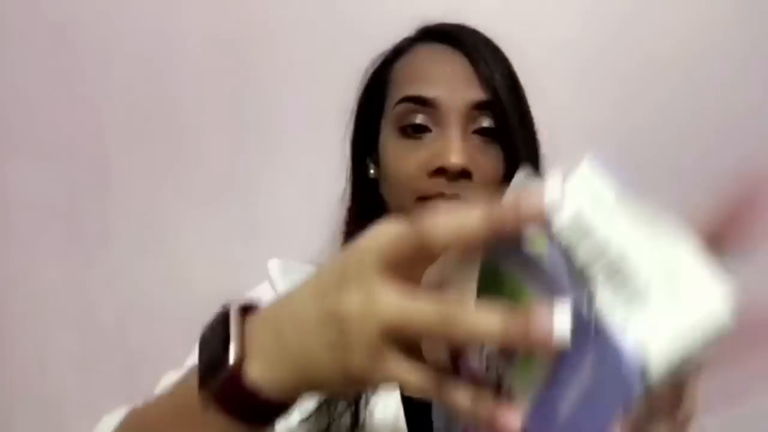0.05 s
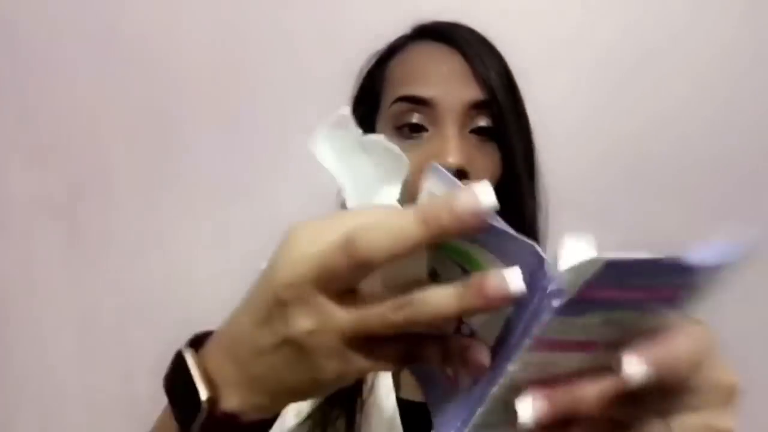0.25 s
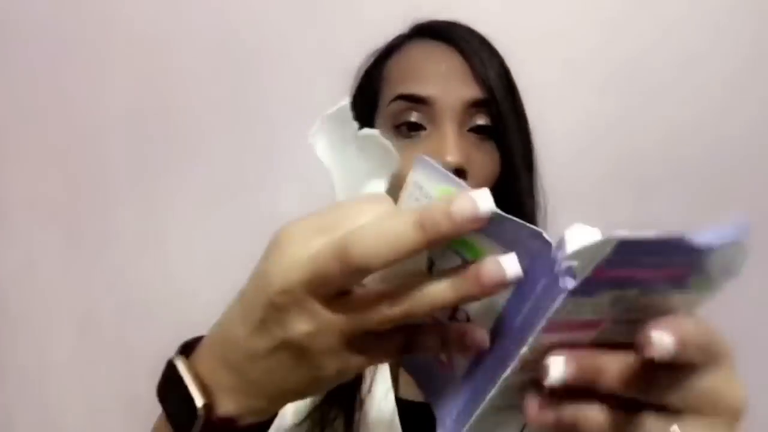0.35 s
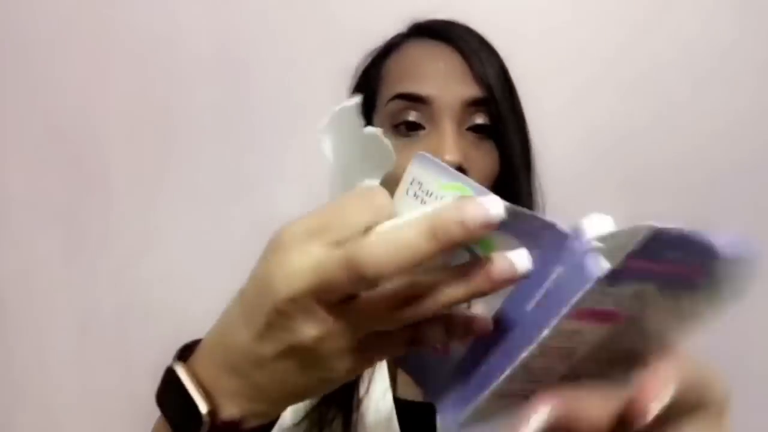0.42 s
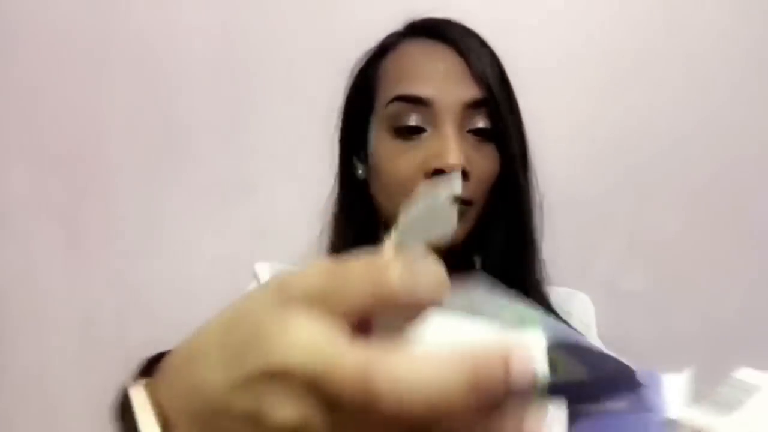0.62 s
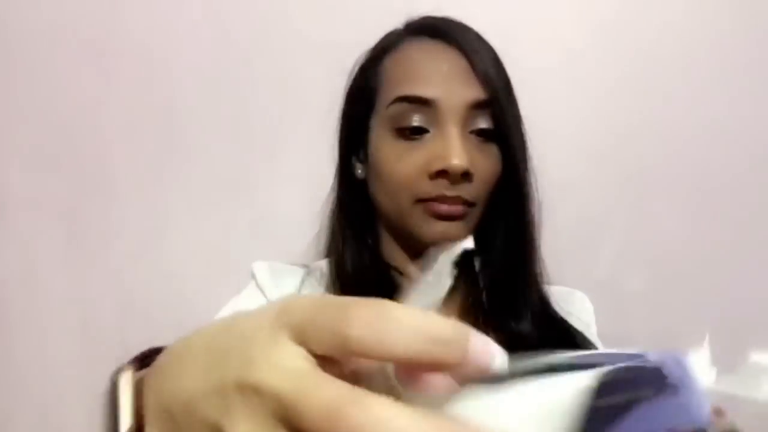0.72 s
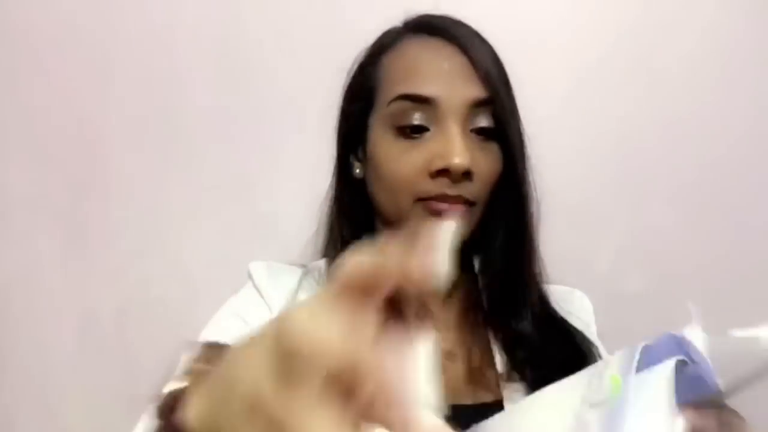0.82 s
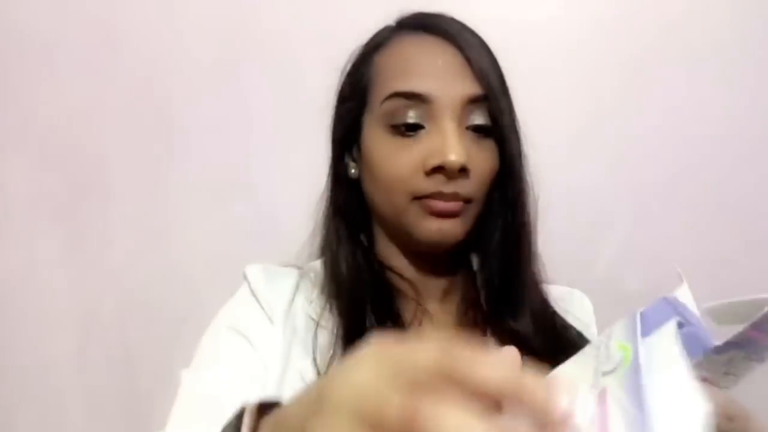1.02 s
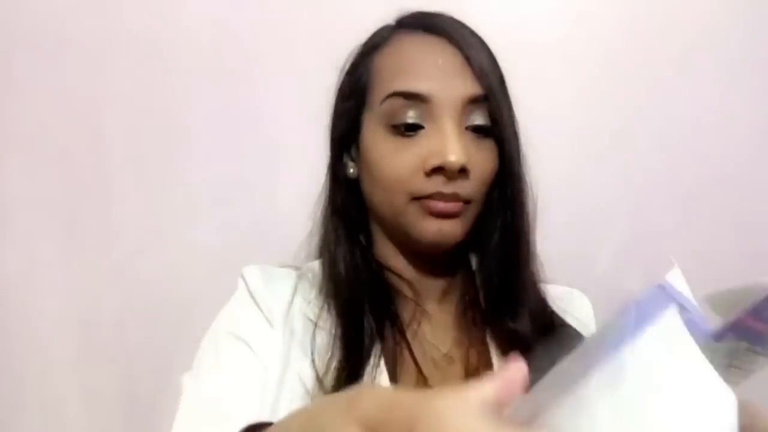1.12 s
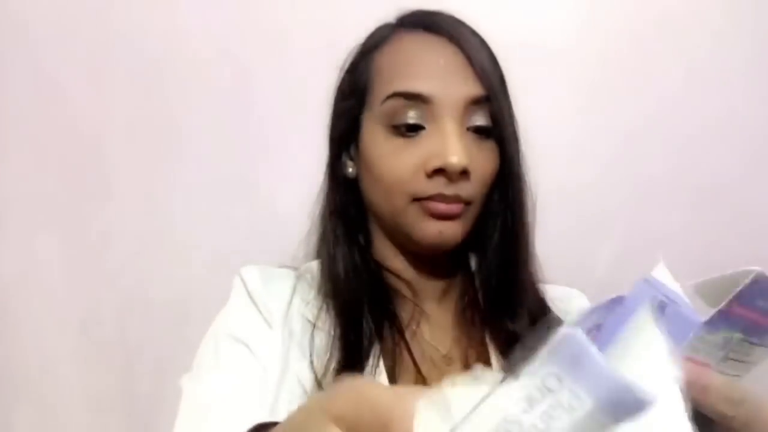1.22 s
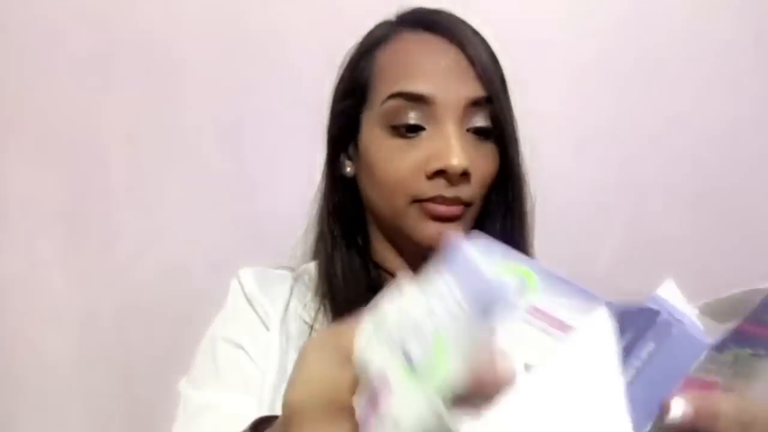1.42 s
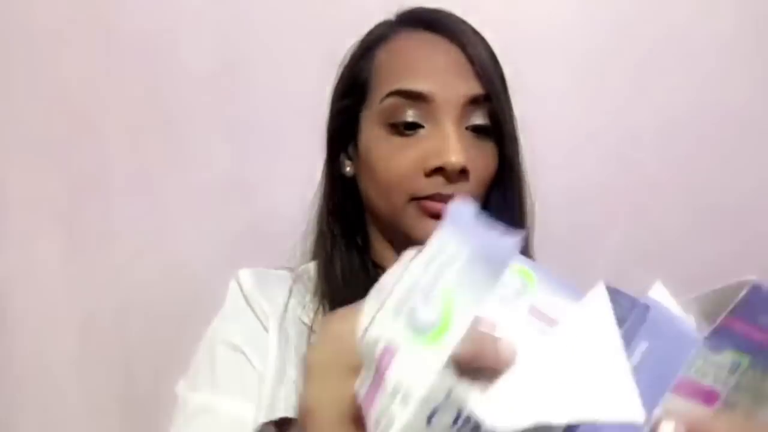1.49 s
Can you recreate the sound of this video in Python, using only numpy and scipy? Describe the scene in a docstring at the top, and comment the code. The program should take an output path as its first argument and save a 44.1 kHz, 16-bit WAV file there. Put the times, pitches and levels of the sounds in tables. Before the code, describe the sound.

A thin cardboard carton is torn and crumpled by hand, close up in a small quiet room. Soft scraping and rustling lead to faint snaps near 0.17 seconds, then a loud, bright pop at 0.22. Small crackles, scrapes and soft low thuds follow, with a crisper cluster around 1.05 to 1.25, thinning to a last light snap at 1.53. Faint room air and hum continue throughout.

```python
"""Hands tear and crumple a thin cardboard carton close to a microphone in a small quiet room.
Scraping and rustling board (band-limited noise) leads to the first faint snaps, then one panel pops loudly.
Smaller creases snap to the end, each an impulsive crack with damped panel modes, among soft low thuds.
Rustle, faint room air (coloured noise) and an appliance's hum (unsteady sines) last throughout."""
import sys
import numpy as np
from scipy import signal
from scipy.fft import rfft, irfft, next_fast_len
from scipy.io import wavfile
from scipy.ndimage import uniform_filter1d, map_coordinates

SR = 44100
rng = np.random.default_rng(int(sys.argv[2]) if len(sys.argv) > 2 else 0)


def bounce(signal):
    """Save signal as a 16-bit WAV file at the path given by the first command-line argument."""
    frames = np.transpose(np.atleast_2d(signal))
    limited = np.clip(frames, -1, 1)
    pcm = np.round(limited * 32767).astype(np.int16)
    wavfile.write(sys.argv[1], SR, pcm)


def elevation(decibels):
    """Turn decibel levels (scalar or array-like) into linear amplitude ratios."""
    levels = np.asarray(decibels, float)
    return 10 ** (levels / 20)


N = 68355  # length in samples


def unit(x):
    """Normalisation: scales a signal to rms 1."""
    return x / np.sqrt(np.mean(x ** 2) + 1e-20)


def coloured(x, points):
    """Linear filtering: shapes x by a spectrum of (f/Hz, level/dB) points, joined on a log frequency axis."""
    m = next_fast_len(x.shape[-1] + 8192)
    f, level = np.transpose(points)
    gain = elevation(np.interp(np.log(np.fft.rfftfreq(m, 1 / SR) + 1), np.log(f + 1), level))
    return irfft(rfft(x, m) * gain, m)[..., :x.shape[-1]]


def wobble(rate):
    """Slow random modulation: a smooth curve through normal knots, rate knots a second."""
    knots = rng.standard_normal(int(N * rate / SR) + 4)
    return map_coordinates(knots, [np.arange(N) * rate / SR])


def add(out, s, x):
    """Superposition: mixes x into out at s seconds."""
    part = out[round(s * SR):][:len(x)]
    part += x[:len(part)]


def ring(t, hz, cycles, sag=0):
    """Damped resonance: envelope peak 1; the pitch starts at (1 + sag) * hz and settles to hz."""
    u = 3 * t * hz / cycles
    envelope = u * np.exp(1 - u)
    return envelope * np.sin(2 * np.pi * (hz * t + sag * (1 - np.exp(-hz * t))))


def room(x):
    """Reverberation: convolution with a fresh noise tail that decays exponentially in each band."""
    # decay time of the room: f/Hz, t60/s
    decay = [(200, 0.35), (530, 0.4), (1400, 0.33), (3700, 0.37), (10000, 0.24)]
    # colour of the reverberation: f/Hz, level/dB
    tail_colour = [(200, -2.5), (1000, -2), (3500, -1.5), (8000, -3), (15000, -3)]
    tail_db, delay_s = -6, 0.0025  # tail level before its colour; lag behind the direct sound
    hz, t, z = signal.stft(rng.standard_normal(SR // 2), SR, nperseg=256)
    f, t60 = np.transpose(decay)
    loss = elevation(-60 * t / np.interp(hz, f, t60)[:, None])
    tail = signal.istft(z * loss, SR, nperseg=256)[1]
    tail = np.pad(tail / np.linalg.norm(tail), (round(delay_s * SR), 0))
    tail = coloured(tail, tail_colour)
    reverb = signal.fftconvolve(np.pad(x, (0, SR // 2)), tail)[:len(x)]
    return x + elevation(tail_db) * reverb


def fibre_crack(t, peak_db):
    """Impulsive fracture: tearing fibres give a broadband burst with a fast rise and exponential decay."""
    # spectrum of a crack: f/Hz, relative level/dB
    crack_colour = [(600, -20.5), (2000, -4.5), (5000, 5), (9000, -2), (15500, -12.5)]
    rise_s, t60_s = 0.00027, 0.0028
    burst = rng.standard_normal(len(t)) * elevation(-60 * t / t60_s) * (1 - np.exp(-t / rise_s))
    crack = coloured(burst, crack_colour)
    return elevation(peak_db) * crack / np.abs(crack).max()


def panel_ring(t, db, hz, cycles):
    """Modal vibration: a buckling panel rings in damped modes, then fibres give way in small crackles."""
    # modes of a panel: multiple of its pitch, level/dB relative to the ring
    modes = [(.72, -13.5), (1.0, -1), (1.4, -16), (2.2, -15)]
    sag, detune = 0.45, 0.051  # detune: random spread of each mode as a fraction of its frequency
    thin_below_hz = 350  # the panel's sound is thinned below this
    after_s, after_db, after_loss_db = 0.02, -13, 247  # mean wait; level under the ring; loss per second
    after_oct, after_cycles = 0.65, 1.58  # pitch spread in octaves; cycles of ring
    panel = np.zeros(len(t))
    for multiple, level in modes:
        mode_hz = hz * multiple * (1 + detune * rng.standard_normal())
        panel += elevation(db + level) * ring(t, mode_hz, cycles, sag)
    for wait, pitch, size in rng.standard_normal((10, 3)):
        late = cycles / hz + after_s * wait ** 2
        crackle_db = db + after_db - after_loss_db * late + 3 * size
        crackle_hz = hz * 2 ** np.clip(after_oct * pitch, -1, 1)
        add(panel, late, elevation(crackle_db) * ring(t[:SR // 50], crackle_hz, after_cycles))
    high_pass = signal.butter(2, thin_below_hz, "high", fs=SR, output="sos")
    return signal.sosfilt(high_pass, panel)


def snaps():
    """Impulse and response: each snapping crease sums a fibre crack and a panel ring, heard in the room."""
    # creases that snap: t/s, ring level/dB, panel pitch f/Hz, cycles of ring, crack peak level/dB
    creases = [(0.165, -31.5, 1520, 1.46, -32), (.172, -43, 1173, 2.2, -38), (.1855, -33.5, 3800, 4.1, -35),
               (0.2145, -11, 4550, 1.4, -11), (.2148, -8.5, 962, 2.35, -19), (.216, -15, 2200, 5.05, -15),
               (0.2239, -19.5, 3720, 7.2, -15), (0.2231, -19.5, 8320, 27, -24),
               (0.225, -23, 1180, 3.1, -25), (0.2269, -19, 3980, 3.7, -21), (0.2287, -27, 1150, 1.8, -16.5),
               (0.3084, -26, 3140, 4.8, -29), (.3095, -31, 900, 1.44, -33), (0.4495, -38.5, 2060, 2.6, -42),
               (0.453, -37.5, 1000, 2.35, -46), (0.4668, -33.5, 2240, 3.8, -32),
               (.5, -42.5, 1180, 3.9, -59), (.533, -50, 3000, 3.3, -43.5), (0.6, -36.5, 3070, 2.5, -58),
               (.682, -41.5, 4560, 3.8, -40), (.802, -39, 3584, 7.9, -50), (.832, -35.5, 3800, 5, -42),
               (.8615, -38, 6240, 18, -43), (0.863, -34.5, 3500, 4.7, -51), (0.8824, -33, 3340, 2.9, -42),
               (0.9628, -37.5, 4000, 6, -37.5), (0.9631, -38.5, 1210, 2.15, -54),
               (1.0446, -28, 4360, 4.8, -19), (1.0505, -34, 2680, 7.7, -35),
               (1.0525, -33.5, 1720, 2.5, -46), (1.06, -38, 2870, 3.2, -48),
               (1.0659, -35.5, 1080, 1.73, -34), (1.086, -41, 1500, 1.95, -38),
               (1.114, -41.5, 1340, 4.3, -59), (1.1356, -37, 1300, 2.17, -48),
               (1.1736, -33, 2960, 10, -25.5), (1.2, -45, 5500, 5.1, -45), (1.2177, -28, 1260, 1.55, -37),
               (1.3803, -43, 3580, 4.4, -41), (1.413, -40.5, 2400, 2.55, -57),
               (1.488, -46.5, 1405, 2.8, -42), (1.501, -48, 2160, 3.3, -44.5),
               (1.5287, -32.5, 2190, 1.95, -50)]
    out, t = np.zeros(N), np.arange(SR // 2) / SR
    for s, db, hz, cycles, crack_db in creases:
        crack = fibre_crack(t, crack_db)
        add(out, s, room(panel_ring(t, db, hz, cycles) + crack))
    return out


def thuds():
    """Damped resonance: soft knocks of the carton's walls start sharp and sag to their pitch."""
    # knocks: t/s, envelope peak level/dB, f/Hz
    knocks = [(.167, -47.5, 142), (0.217, -36, 295), (0.223, -37, 138.6), (.3095, -33.5, 160),
              (0.322, -49.5, 70.8), (.451, -43.5, 443), (.4995, -43.5, 376), (.837, -46.5, 450),
              (0.8846, -40, 795), (1.049, -45.5, 297), (1.065, -52.5, 100), (1.182, -62, 232),
              (1.218, -53, 112), (1.31, -48, 347), (1.53, -47.5, 285)]
    out, t = np.zeros(N), np.arange(SR // 2) / SR
    for s, db, hz in knocks:
        add(out, s, room(elevation(db) * ring(t, hz, cycles=1.98, sag=1.046)))
    return out


def scrapes():
    """Friction noise: board strokes board as gritty noise round one resonance, swelling and fading."""
    # strokes: start t/s, length/s, noise level/dB rms before swell and grit, centre f/Hz
    strokes = [(0, 0.0132, -47.5, 6355), (0.105, 0.042, -56.5, 2480), (0.314, 0.031, -47, 2930),
               (.44, 0.0229, -55, 1447), (0.461, 0.012, -46, 3750), (0.474, 0.035, -53, 3800),
               (0.705, 0.04, -50.5, 3700), (0.803, 0.0227, -53, 4080), (0.805, 0.018, -51.5, 970),
               (0.844, 0.0612, -53, 3870), (1.04, 0.033, -46.5, 1600), (1.173, 0.0097, -46, 4195),
               (1.229, 0.054, -49, 1520), (1.233, 0.035, -49.5, 3740), (1.25, 0.025, -43, 4000),
               (1.371, 0.028, -58, 7140), (1.486, 0.019, -56.5, 6130)]
    width_oct, skirt_db = 0.51, 8  # the level falls by skirt_db for each width away from the centre
    rise = 0.43  # fraction of the stroke spent swelling
    out, grit = np.zeros(N), elevation(2.5 * wobble(400))
    for s, length, db, hz in strokes:
        u = np.arange(round(length * SR)) / (length * SR)
        swell = np.sin(np.pi * np.interp(u, [0, rise, 1], [0, 0.5, 1]))
        band = [(hz * 2 ** (k * width_oct), -skirt_db * abs(k)) for k in range(-9, 10)]
        add(out, s, elevation(db) * swell * unit(coloured(rng.standard_normal(len(u)), band)))
    return room(out * grit)


def patchy():
    """Time-frequency modulation: noise whose narrow patches have random gain."""
    z = signal.stft(rng.standard_normal(N), nperseg=512)[2]
    field = uniform_filter1d(rng.standard_normal(z.shape), size=3, axis=0)  # across frequency
    field = uniform_filter1d(field, size=5, axis=1)  # along time
    return signal.istft(z * elevation(4.5 * unit(field)), nperseg=512)[1][:N]


def crackle_gate():
    """Shot noise: random ticks with exponential decays modulate the rubbing."""
    grains_per_s, spread_db, t60_s = 350, 2.5, 0.019
    share = 0.52  # part of the power that the grains modulate
    sizes = elevation(spread_db * np.clip(rng.standard_normal(N), -2, 2))
    ticks = (rng.random(N) < grains_per_s / SR) * sizes
    decay = elevation(-60 * np.arange(SR // 20) / SR / t60_s)
    grains = unit(signal.fftconvolve(ticks, decay)[:N])
    return np.sqrt(1 - share + share * grains ** 2) * elevation(wobble(25))


def rustle():
    """Amplitude-modulated friction noise: three bands of rubbing share one set of tiny crackles."""
    # handling of the board: t/s, body rustle level/dB, surface rustle level/dB, treble level/dB
    handling = [(0, -54.5, -45.5, -58), (0.07, -55.5, -60, -73.5), (.155, -61, -58.5, -68),
                (0.212, -47, -46, -59), (.36, -56.5, -56, -66), (.43, -57.5, -56.5, -61.5),
                (.5, -56.5, -59.5, -60), (0.589, -62, -56.5, -69.5), (.67, -58, -60, -69),
                (.7, -58.5, -53.5, -66.5), (.79, -64.5, -55, -61.5), (0.862, -53, -49.5, -55.5),
                (.93, -58.5, -58, -70), (.955, -66, -59.5, -68), (.98, -62, -62.5, -78),
                (1.035, -65.5, -56.5, -62), (1.1, -53.5, -58, -67), (1.165, -55, -60.5, -65),
                (1.2, -51.5, -58, -66), (1.288, -61, -62.5, -70.5), (1.359, -65, -65, -70.5),
                (1.42, -65, -66, -72.5), (1.471, -77.5, -76, -85), (1.496, -60.5, -66, -63),
                (1.55, -73, -58.5, -69.5)]
    # spectra of the three bands: f/Hz, relative level/dB per Hz
    body = [(180, -53), (300, -10), (440, -6), (605, -8.5), (847, -1.5), (1060, -3.5), (2800, -7),
            (3640, -57)]
    surface = [(940, -38), (1600, -2.5), (2800, -2), (3620, 1), (5290, -4.5), (6250, -3), (8500, -11),
               (11000, -63.5)]
    treble = [(3530, -47), (6000, -11.5), (7930, -14), (10300, -13.5), (14900, -15), (16000, -33.5)]
    gate, t, out = crackle_gate(), np.arange(N) / SR, np.zeros(N)
    s, *levels = np.transpose(handling)
    for db, colour in zip(levels, (body, surface, treble)):
        strength = elevation(np.interp(t, s, db) + wobble(39.72))
        out += strength * unit(coloured(gate * patchy(), colour))
    return out


def hum():
    """Tonal radiation: an appliance's sines waver slightly in level and phase."""
    # partials: f/Hz, level/dB rms about which each wavers
    partials = [(61, -73.5), (123, -71), (246, -70)]
    t, out = np.arange(N) / SR, np.zeros(N)
    for hz, db in partials:
        level = np.sqrt(2) * elevation(db + wobble(5))
        out += level * np.sin(2 * np.pi * hz * t + 0.3 * wobble(3))
    return out


def room_air():
    """Stationary noise: the air of the room as steady coloured noise at -65 dB rms."""
    # spectrum of the air: f/Hz, relative level/dB per Hz
    air_colour = [(20, -29), (40, -14), (60, -9.5), (150, -4.5), (250, -7), (350, -15), (700, -24.5),
                  (1400, -30), (3250, -30), (9300, -40), (16000, -48)]
    return elevation(-65) * unit(coloured(rng.standard_normal(N), air_colour))


def scene():
    """Superposition: all sources sum at the microphone, in one channel."""
    return (snaps() + thuds() + scrapes() + rustle() + hum() + room_air())[None]


def roll_off(x):
    """The treble ends steeply here."""
    return signal.sosfilt(signal.butter(12, 16480, fs=SR, output="sos"), x)


def record(dry):
    """Band limitation: the microphone passes 50 Hz to 15.9 kHz."""
    low = signal.butter(3, 50, "high", fs=SR, output="sos")
    top = signal.butter(12, 15900, "low", fs=SR, output="sos")
    mix = signal.sosfilt(top, signal.sosfilt(low, dry))
    return roll_off(mix)


dry = scene()
out = record(dry)
bounce(out)
```